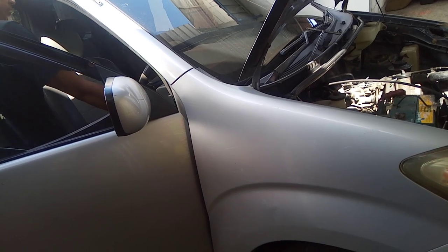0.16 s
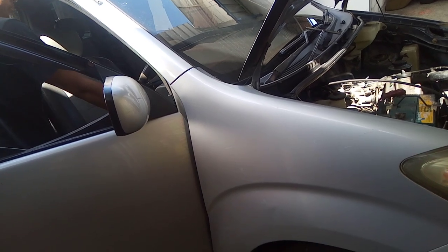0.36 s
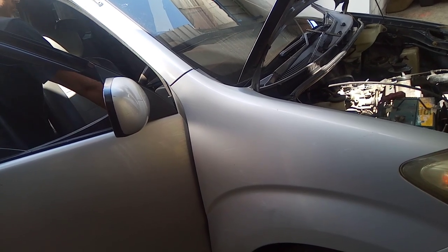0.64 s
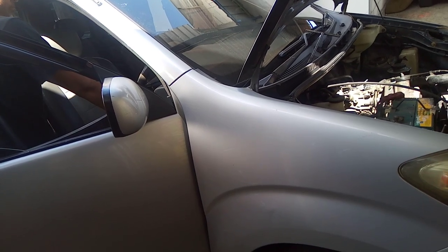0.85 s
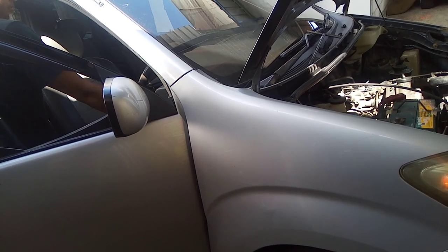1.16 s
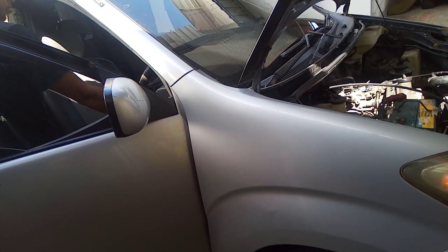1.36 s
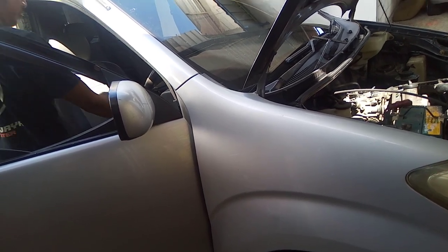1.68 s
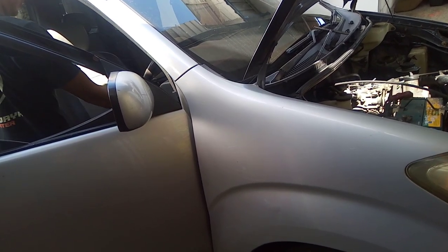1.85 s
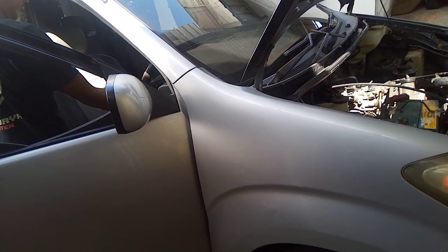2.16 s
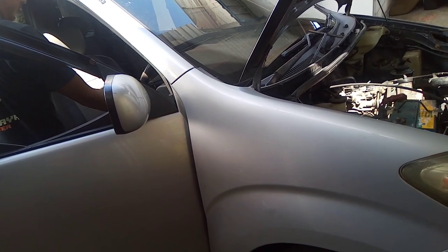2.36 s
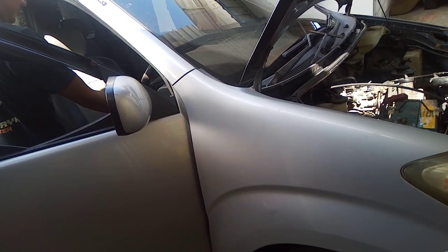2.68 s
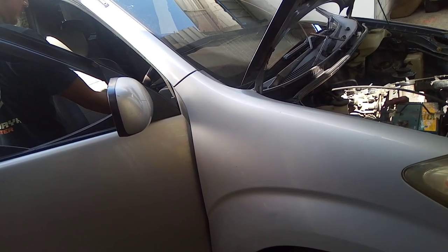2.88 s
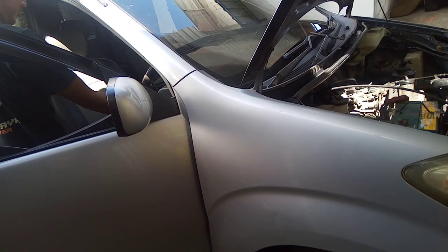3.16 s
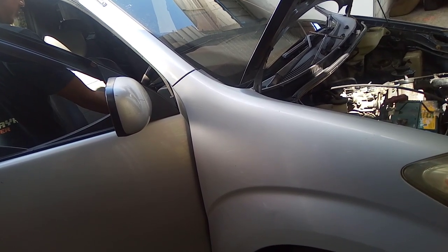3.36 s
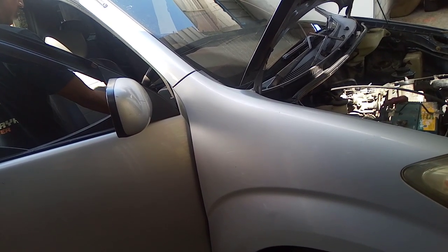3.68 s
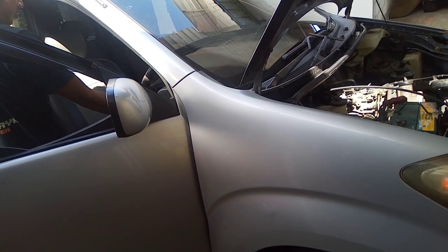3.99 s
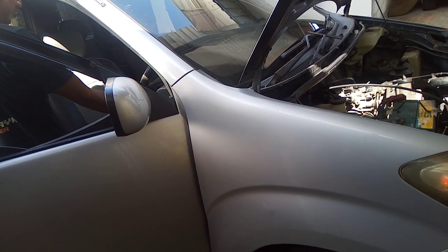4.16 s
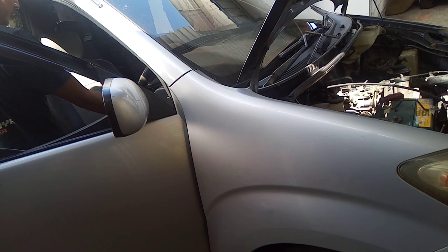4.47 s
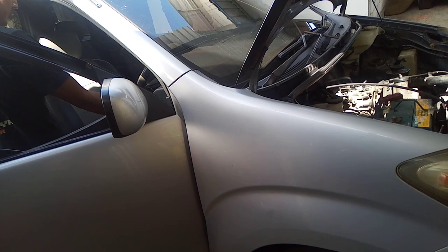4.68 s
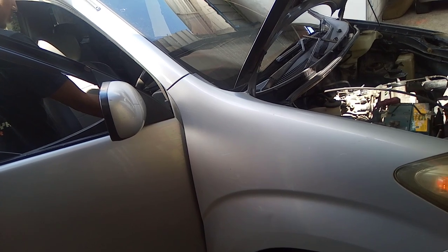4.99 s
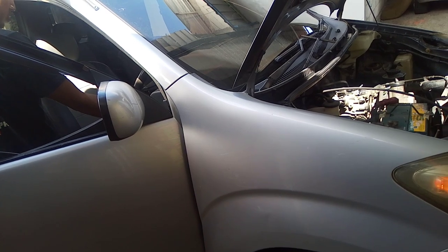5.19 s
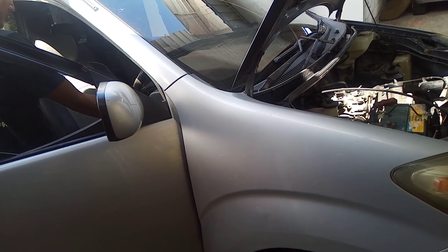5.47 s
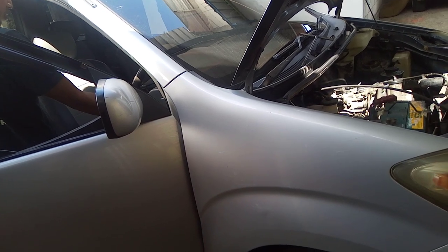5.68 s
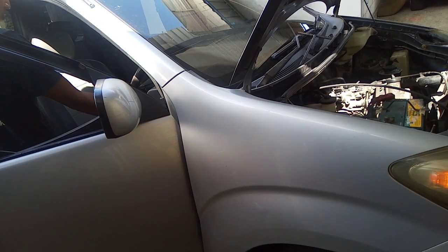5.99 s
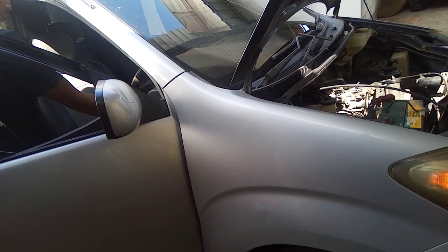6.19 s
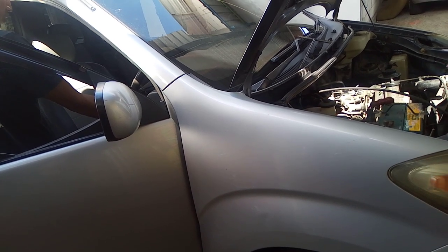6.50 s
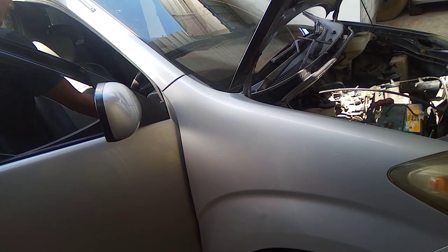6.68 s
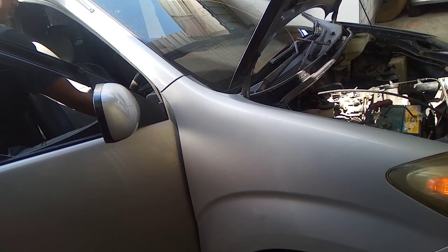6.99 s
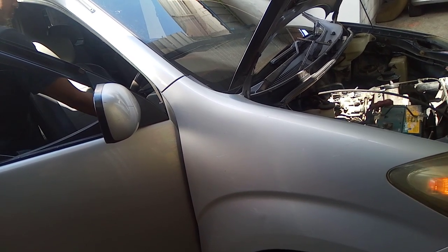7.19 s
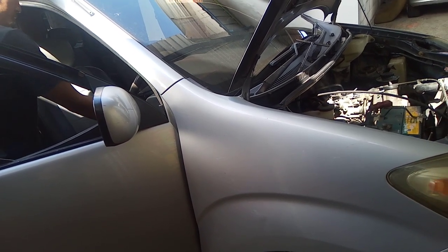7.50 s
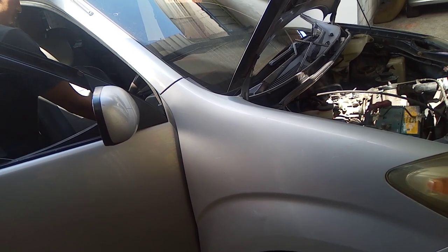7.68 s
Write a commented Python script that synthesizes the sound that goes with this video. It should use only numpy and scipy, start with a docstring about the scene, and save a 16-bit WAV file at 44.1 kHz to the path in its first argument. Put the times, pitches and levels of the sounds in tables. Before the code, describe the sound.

A close microphone by the engine bay picks up quiet air rush, a crisp click, a short pump whirr, another click and a single hard pop. A heavy clunk starts a rattling, whining starter motor that soon drops out with a knock. After a short gap it groans back into a long, fast, regular churning crank, briefly hurrying midway, without the engine catching.

```python
"""A soft steady rush, then key and relay click and small motors whirr beside an open bonnet.
After a sharp pop the pinion slams in; a starter motor cranks a four-cylinder engine that will not catch,
falls back once, groans up again and cranks on. Filtered noise makes the rush, knocks and thumps, and a faint
high band whose level changes over time. Counted gear teeth drive whine and rattle: each compression drags
the whine down and hushes the rattle, and a weak firing briefly hurries the crankshaft."""
import sys
import numpy as np
from scipy import signal
from scipy.fft import rfft, irfft, next_fast_len
from scipy.io import wavfile

SR = 44100
rng = np.random.default_rng(int(sys.argv[2]) if len(sys.argv) > 2 else 0)


def log_audio(samples):
    """Write samples as a 16-bit WAV file to the path given in sys.argv[1]."""
    # one column per channel
    frames = np.atleast_2d(samples).T
    # limit to full scale, then quantise
    limited = np.clip(frames, -1, 1)
    pcm = np.round(limited * 32767).astype(np.int16)
    wavfile.write(sys.argv[1], SR, pcm)


N = 345876
TIME = np.arange(N) / SR


def undb(db):
    """Decibels to an amplitude factor."""
    return 10 ** (np.asarray(db) / 20)


def unit(x):
    """Scale to an RMS of 1."""
    return x / np.sqrt(np.mean(x ** 2))


def curves(table):
    """Each column of a table, joined by straight lines in time."""
    s, *columns = np.transpose(table)
    return [np.interp(TIME, s, column) for column in columns]


def colour(x, points):
    """Filter by a spectrum of (pitch_hz, level_db) points, joined along log frequency."""
    hz, db = np.transpose(points)
    size = next_fast_len(len(x))
    f = np.maximum(np.fft.rfftfreq(size, 1 / SR), 1)
    gain = undb(np.interp(np.log(f), np.log(hz), db))
    return irfft(rfft(x, size) * gain, size)[:len(x)]


def resonate(x, modes):
    """A bank of parallel resonances (pitch_hz, width_hz, level_db)."""
    return sum(undb(db) * signal.lfilter(*signal.iirpeak(hz, hz / width, fs=SR), x)
               for hz, width, db in modes)


def resonate_twice(x, hz, width, db):
    """One resonance passed twice, for steeper skirts."""
    return resonate(resonate(x, [(hz, width, db)]), [(hz, width, 0)])


def noise(length=N):
    """White noise."""
    return rng.standard_normal(length)


def walk(rate):
    """A random drift with spread 1, through `rate` random points per second."""
    knots = noise(400 * 8)
    return unit(np.interp(TIME * rate, np.arange(len(knots)), knots))


def scatter(x, t60, wet_db):
    """Direct sound plus the dense ringing of the metal parts around it, dying 60 dB in t60 seconds."""
    t = TIME[:SR // 3]
    tail = noise(len(t)) * undb(-60 * t / t60)
    tail *= undb(wet_db) / np.sqrt(np.sum(tail ** 2))
    return x + signal.fftconvolve(x, tail)[:N]


# level of the faint high-band noise over time: time_s, level_db
HIGH_BAND_LEVEL = [(0, -55), (.45, -68), (.7, -71.5), (2.7, -84), (2.85, -62), (3.1, -74), (7.84, -75)]


def high_band():
    """Faint high-band noise, its level changing over time."""
    level_db, = curves(HIGH_BAND_LEVEL)
    band_colour = [(7000, -29), (10500, -10), (11700, -1), (12600, -13), (15000, -22)]
    return undb(level_db) * unit(colour(noise(), band_colour))


# colour of the steady rush, also mixed into the whirrs: pitch_hz, level_db
AIR_COLOUR = [(40, -30), (120, -1), (300, -12), (470, -10.5), (800, 5.5), (1500, 9.5), (1900, 2),
              (2280, -7), (3100, 3), (4400, -6), (5600, 4.5), (6900, -6.5), (7800, -18), (9000, -38),
              (10500, -26), (12500, -68), (15000, -55)]
RUSH_DB = -43.5


def yard(rumble_db=-60, waver_db=1.0):
    """A soft steady rush and an uneven distant rumble, each from coloured noise."""
    rush = unit(colour(noise(), AIR_COLOUR)) * undb(RUSH_DB + waver_db * walk(26))
    low_colour = [(25, -24), (80, 1.0), (200, -2.5), (600, -3), (2000, -45), (8000, -80)]
    rumble = unit(colour(noise(), low_colour)) * undb(rumble_db + walk(2.4))
    return rush + rumble


# hollows of the engine bay: pitch_hz, width_hz, level_db
BAY_HOLLOWS = [(1290, 910, -9), (1670, 400, 9), (3280, 1400, 4), (5400, 1030, -14)]
# small electric motors whirr once the ignition is on: start_s, length_s, level_db
WHIRRS = [(0.58, 0.2, -38), (0.99, 0.027, -53), (1.15, .07, -51.5), (1.654, 0.14, -42.5)]
# one of them sings briefly: centre_s, spread_s, pitch_hz, level_db
PUMP_TONE = (1.18, .04, 1572, -47)


def whirrs(attack_s=0.043, release_s=0.13, rough_db=0.5):
    """Pump and valve motors whirr as noise through the hollows of the engine bay; one sings a faint note."""
    bay = unit(sum(resonate_twice(noise(), *hollow) for hollow in BAY_HOLLOWS))
    level = 0
    for start, length, db in WHIRRS:
        swell = np.minimum(TIME - start, 0) / attack_s
        fade = np.maximum(TIME - start - length, 0) / release_s
        level = level + undb(db) * np.exp(swell - fade)
    centre, spread, hz, db = PUMP_TONE
    note = unit(np.sin(2 * np.pi * np.cumsum(hz * (1 + .006 * walk(59.7))) / SR))
    note_level = undb(db) * np.exp(-.5 * ((TIME - centre) / spread) ** 2)
    whirr = unit(bay + undb(-1.5) * unit(colour(noise(), AIR_COLOUR)))
    return whirr * level * undb(rough_db * walk(17.7)) + note * note_level


# the engine rocks on its mounts or coughs, the car's body stirs: centre_s, level_db, pitch_hz, spread_s
THUMPS = [(0.247, -44, 149, 0.014), (0.427, -53.5, 278, 0.075), (1.439, -41, 240, 0.032),
          (1.559, -43.5, 71, 0.065), (1.63, -44, 170, 0.052), (1.926, -29, 172, 0.018),
          (2.023, -38.5, 165, 0.057), (2.176, -38, 310, 0.024), (2.702, -31.5, 173, 0.035),
          (2.89, -39.5, 245, 0.041), (3.239, -39, 191, 0.022), (3.615, -50, 190, 0.045),
          (5.086, -42, 267, 0.035), (5.239, -47, 110, 0.093), (6.693, -41, 193, 0.068),
          (7.291, -36, 185, 0.033), (7.55, -49, 300, 0.14)]


def thumps():
    """Engine block, exhaust and bodywork swell softly: low resonant noise under bell-shaped envelopes."""
    out = np.zeros(N)
    for s, db, hz, spread in THUMPS:
        near = np.flatnonzero(abs(TIME - s) < 1 / 4)
        rumble = unit(resonate_twice(noise(SR), hz, hz * 1.44, 0))[:len(near)]
        out[near] += rumble * undb(db) * np.exp(-.5 * ((TIME[near] - s) / spread) ** 2)
    return out


POP_S = 1.505
# a lone sharp pop: tick_db, thud_db, thud_hz (where its falling pitch settles), t60_s
POP = (-6, -17.5, 85, 0.06)


def pop():
    """A single sharp tick, a low-passed impulse, with a short low thud behind it."""
    tick_db, thud_db, hz, t60 = POP
    t = np.maximum(TIME - POP_S, 0)
    impulse = np.diff(t > 0, prepend=False).astype(float)
    tick = signal.lfilter(*signal.butter(7, 6500, fs=SR), impulse)
    cycles = hz * t * (1 + 1.1 * np.exp(-t / 0.012))
    thud = -np.sin(2 * np.pi * cycles) * np.exp(-np.log(1000) * t / t60)
    return undb(tick_db) * tick / tick.max() + undb(thud_db) * thud


# colour of the snaps: pitch_hz, level_db
SNAP_COLOUR = [(880, -45), (1500, -3), (1750, 5), (2060, -18), (2310, -6), (2810, -1), (3750, -4),
               (4210, 5.5), (5150, 1), (6940, 4), (8830, -30), (10900, -10), (15000, -52)]
# ringing of the key and relay: pitch_hz, width_hz, level_db
SNAP_RING = [(3540, 40, 3), (3840, 140, 1), (4210, 66, -8), (4780, 40, -6), (6880, 140, -5)]
# ringing of bell housing and starter body, in clunks and gears: pitch_hz, width_hz, level_db
HOUSING_MODES = [(547.6, 23, -2.5), (624, 11, -4.5), (746.5, 22, 7), (900.5, 26, 0), (1128, 113, -4.5),
                 (1297.4, 38, -0.5), (1564, 20, -6.5), (1705, 18, -4.5), (1816, 37, 5.5)]
# key, relay, solenoid and pinion knocks: peak_s, snap_db, clunk_db, snap_t60_s, rise_s
CLICKS = [(0.408, -54, -46, .05, .002), (0.578, -25, -43.5, 0.21, 0.0015),
          (1.378, -25.5, -34.5, .22, 0.0036), (1.622, -47, -37.5, 0.076, 0.006),
          (1.901, -20, -30, 0.025, 0.0049), (1.915, -22.5, -19.5, 0.18, 0.0012),
          (2.625, -22, -24, 0.14, 0.0043), (2.676, -43, -20, 0.3, 0.018), (3.2, -64, -34.5, 0.17, 0.017),
          (3.301, -53, -31.5, 0.14, 0.0071), (3.337, -45, -26.5, 0.1, .008)]


def clicks(clunk_ring=2):
    """Each switch or knock snaps, and its clunk rings on in the housing, clunk_ring times as long."""
    snap = unit(colour(scatter(noise(), t60=0.29, wet_db=23), SNAP_COLOUR))
    snap = unit(snap + undb(-5.5) * unit(resonate(noise(), SNAP_RING)))
    hit = noise()
    clunk_colour = [(60, -40), (170, -10.5), (550, 5.5), (1200, 2.5), (1900, 1.0), (3000, -3.5), (8000, -60)]
    clunk = unit(unit(colour(hit, clunk_colour)) + .5 * unit(resonate(hit, HOUSING_MODES)))
    out = np.zeros(N)
    for s, snap_db, clunk_db, t60, rise in CLICKS:
        attack = np.exp(np.minimum(TIME - s, 0) / rise)
        fall_db = -60 * np.clip(TIME - s, 0, 1) / t60
        out += attack * snap * undb(snap_db + fall_db)
        out += attack * clunk * undb(clunk_db + fall_db / clunk_ring)
    return out


# the starter winds up from rest: time_s, pitch_hz, level_db
WIND_UP = [(3.0, 230, -45), (3.05, 231.2, -49), (3.16, 204.2, -35), (3.182, 211, -28), (3.2, 393, -31),
           (3.225, 545, -25), (3.26, 564, -63)]


def wind_up(growl_db=2):
    """The armature groans as it breaks away: a gliding tone roughened by fast random drifts."""
    hz, db = curves(WIND_UP)
    angle = 2 * np.pi * np.cumsum(hz * (1 + 0.042 * walk(150))) / SR
    growl = undb(growl_db) * walk(110) * np.cos(angle) + 1.5 * walk(300) * np.sin(2 * angle)
    sounding = (TIME > WIND_UP[0][0]) * (TIME < WIND_UP[-1][0])
    return unit(np.sin(angle) + growl) * undb(db) * sounding


def block(db=-52, lumpy_db=6.0):
    """The turning engine mutters in its low resonances, each drifting in level on its own."""
    modes = [(151, 49, -7), (255, 140, -15.0), (361, 153, 6.0)]  # pitch_hz, width_hz, level_db
    mutter = sum(resonate_twice(noise(), *mode) * undb(lumpy_db * walk(16)) for mode in modes)
    return undb(db) * unit(mutter)


COAST_DB_PER_S, COAST_FLOOR_DB = 74, -20  # the gears run down once the key is let go
# each turn of the key: pinion_in_s, let_go_s, rise_db_per_s, free_swing_s (moment of one free swing)
CRANKS = [(1.9, 2.741, 900, 2.34), (3.24, 7.9, 162, 3.85)]


def drive():
    """How hard the pinion drives the flywheel (dB): it bites, holds, and coasts when the key is let go."""
    turns = []
    for start, stop, rise, _ in CRANKS:
        bite_db = np.minimum(rise * (TIME - start), 0)
        coast_db = np.clip(COAST_DB_PER_S * (stop - TIME), COAST_FLOOR_DB, 0)
        turns.append(bite_db + coast_db)
    return np.maximum(np.max(turns, axis=0), -90)


def stroke(turned, lead, rise):
    """One piston stroke, -1 to 1: a quick spring past top centre, then a slow sag under compression."""
    return np.interp((turned + lead) % 1, [0, 1 - np.clip(rise, .1, .9), 1], [1, -1, 1])


TEETH_PER_STROKE = 53
PINION_MIN_RATE = 9.3  # strokes per s; the pinion runs ahead of a slower crank
# crankshaft labours up, slows, restarts, and hurries on a weak firing: time_s, rate_strokes_per_s
CRANK_SPEED = [(1.9, 4.9), (2.1, 5.8), (2.25, 9.79), (2.6, 11.32), (2.75, 4.4), (3.2, 4.62), (3.45, 10.46),
               (3.75, 12.01), (4.4, 11.58), (5.0, 11.01), (5.12, 16.01), (5.45, 12.2), (5.95, 11.24),
               (6.6, 10.81), (7.35, 10.86), (7.7, 10.8)]


def crankshaft(sway=.125, free_rate=11.3, hunt=.008, lead=.14, rise=.3, uneven=.2):
    """Strokes turned, teeth passed, and pinion load, which peaks while compression slows the crank."""
    rate, = curves(CRANK_SPEED)
    total = np.cumsum(rate) / SR
    turned = total
    for start, _, _, swing_s in CRANKS:
        # count strokes from the free swing, so each crank falls in step with it
        turned = np.where(TIME > start - 1 / 4, total - np.interp(swing_s, TIME, total), turned)
    pinion = np.maximum(rate, PINION_MIN_RATE)
    drag = np.clip(sway * (free_rate / pinion) ** 4, 0, .2)  # a slow engine is held back more
    pulse = drag * (1 + uneven * walk(9)) * stroke(turned, lead, rise)
    speed = pinion * (1 + pulse + hunt * walk(120))
    teeth = TEETH_PER_STROKE * np.cumsum(speed) / SR
    load = np.sin(2 * np.pi * (turned + lead)) * drag / sway
    return turned, teeth, load


def impacts(teeth, spread_db, clatter_db):
    """One blow per flywheel tooth, each of its own size, amid looser chatter from the starter's gears."""
    size = undb(spread_db * np.clip(noise(), -2, 2))
    blows = np.diff(np.floor(teeth), prepend=0) * size * rng.choice([-1, 1], N)
    chatter = (rng.random(N) < 5000 / SR) * noise()  # about 5000 ticks per s
    return unit(blows) + undb(clatter_db) * unit(chatter)


# colour of the gear growl: pitch_hz, level_db
GEAR_COLOUR = [(50, -48), (130, -33), (420, -20.5), (530, -11), (850, -4.5), (1100, -6), (1500, -2),
               (1850, -8.5), (2000, -7.5), (2400, -11.5), (3200, -28), (6000, -57)]


def gears(teeth, load, drive_db, ring_db=1.5, direct=0.29, whine_db=-6.0, load_db=3):
    """The mesh tone sweeps the housing's modes, loudest on each loaded fall, over the growl of the teeth."""
    mesh = 0
    for k, db in enumerate([-13, 0, -3], 1):
        level = undb(db + 3 * walk(70))
        mesh = mesh + level * np.sin(2 * np.pi * k * teeth + .5 * walk(150))
    mesh = mesh * undb(load_db * np.clip(load, -1, 1) + drive_db)
    whine = scatter(unit(resonate(mesh, HOUSING_MODES) + direct * mesh), t60=.09, wet_db=-7)
    blows = scatter(impacts(teeth, spread_db=6.5, clatter_db=2.5), t60=0.026, wet_db=-6)
    blows = colour(blows, GEAR_COLOUR)
    growl = unit(unit(blows) + undb(ring_db) * unit(resonate(blows, HOUSING_MODES)))
    return unit(growl + undb(whine_db) * whine)


# colour of the tooth rattle: pitch_hz, level_db
RATTLE_COLOUR = [(1500, -38), (2600, -13.5), (3200, -4), (3800, -4), (4500, -7), (5200, 0.5), (5900, 1),
                 (6500, -3.5), (7300, -10), (7900, -23), (9000, -31.5), (10400, -26.5), (12500, -35.5),
                 (15500, -47.5)]
# ringing of the flywheel teeth: pitch_hz, width_hz, level_db
TOOTH_RING = [(3507, 11.3, 2.5), (3591, 34, -0.5), (4800, 14, -5), (5400, 52, -19), (5894, 110, -5),
              (5680, 16.5, 3)]


def rattle(teeth, swing, ring_db=-7, sing_db=-10, bright_db=2, flutter_db=0.74):
    """Backlash rings ring gear, pinion and cover; free-swinging teeth sound brighter."""
    parts = [impacts(teeth, spread_db=4, clatter_db=-2) for _ in range(2)]
    spread = sum(scatter(part, t60=0.24, wet_db=6.5) for part in parts)
    spread = unit(colour(spread, RATTLE_COLOUR))
    ring = unit(resonate(colour(parts[0], RATTLE_COLOUR), TOOTH_RING))
    # high overtones of the mesh light up the ring gear's modes as they slide past
    overtones = sum(gain * np.sin(2 * np.pi * k * teeth + .6 * walk(200))
                    for k, gain in [(6, 1), (9, .6), (10, .6)])
    sing = unit(resonate(overtones, TOOTH_RING) + 0.066 * overtones)
    metal = unit(spread + undb(ring_db) * ring + undb(sing_db) * sing)
    edge = signal.sosfiltfilt(signal.butter(3, 7500, "high", fs=SR, output="sos"), metal)
    edge_gain = undb(bright_db * swing + 1.25 * walk(25))
    return (metal + edge * (edge_gain - 1)) * undb(flutter_db * walk(90))


# how hard the starter works, before trims: time_s, rattle_db, throb_db (rattle swing per stroke), gear_db
EFFORT = [(2.0, -21.5, 2, -22), (2.45, -19, 2.5, -23.5), (2.75, -22, 3, -30), (3.3, -22, 3, -22),
          (3.55, -19, 1, -24.5), (4.05, -20, 4, -26), (4.6, -18.5, 0, -25), (5.15, -19, 2.5, -24.5),
          (5.5, -18.5, 0.5, -25.5), (7.3, -18, -0.8, -25.5), (7.7, -20, 2, -22)]


def starter(gear_db=0.0, rattle_db=-1.5, throb_db=1.1, slack=1.64, uneven_db=.5):
    """Whine and rattle throb with the strokes; rattle peaks near the free swing and dies first on release."""
    drive_db = drive()
    tooth_db, depth_db, mesh_db = curves(EFFORT)
    turned, teeth, load = crankshaft()
    swing = np.cos(2 * np.pi * turned)
    gear_beat_db = throb_db * stroke(turned, lead=-0.3, rise=0.22)
    low = gears(teeth, load, drive_db) * undb(gear_db + mesh_db + drive_db + gear_beat_db)
    beat_db = depth_db * stroke(turned, lead=0.082, rise=0.3) + uneven_db * walk(20)
    high = rattle(teeth, swing) * undb(rattle_db + tooth_db + beat_db + slack * drive_db)
    return low + high + block() * undb(drive_db) + wind_up()


def scene():
    """Everything reaches both channels alike."""
    mix = starter() + clicks() + thumps() + pop() + whirrs() + yard() + high_band()
    return np.tile(mix, (2, 1))


TOP_HZ = 15500


def record(dry):
    """The recorder cuts the deepest bass, rounds the tallest peaks and cuts the top."""
    dry = signal.sosfilt(signal.butter(3, 45, "high", fs=SR, output="sos"), dry)
    rounded = dry / (1 + (dry / .62) ** 6) ** (1 / 6)
    return signal.sosfilt(signal.ellip(10, .2, 90, TOP_HZ, fs=SR, output="sos"), rounded)


dry = scene()
out = record(dry)
log_audio(out)
```